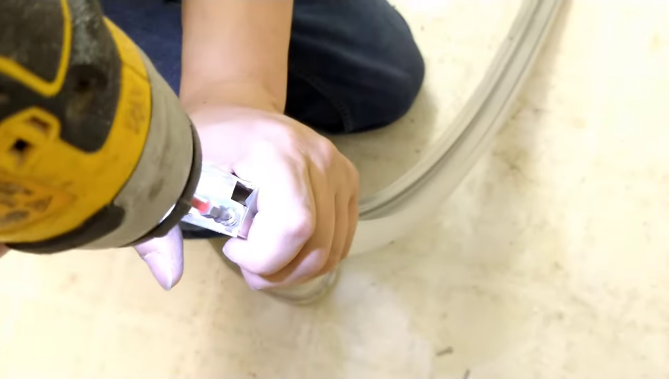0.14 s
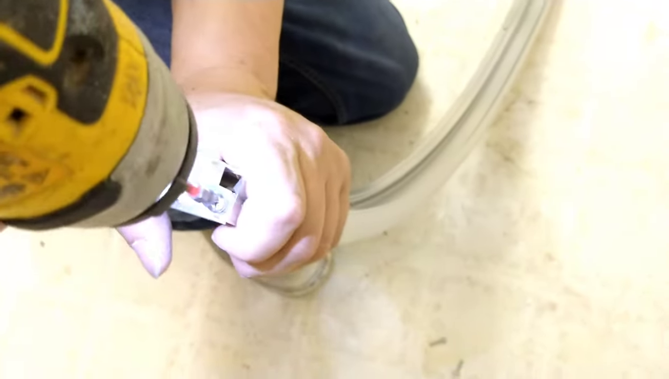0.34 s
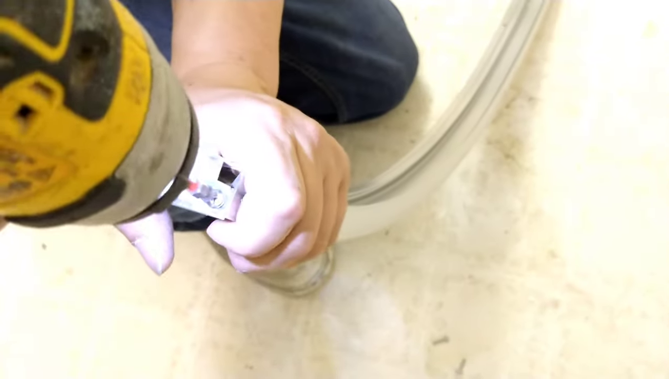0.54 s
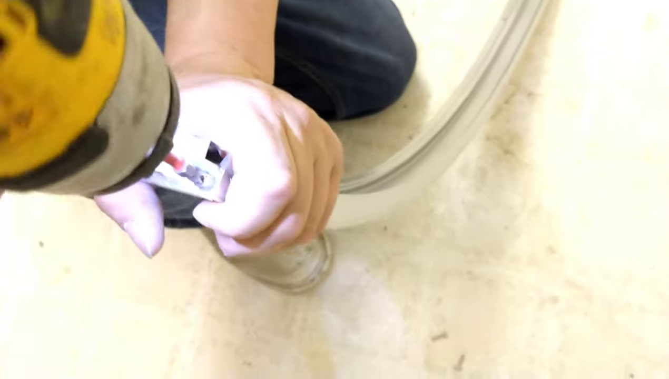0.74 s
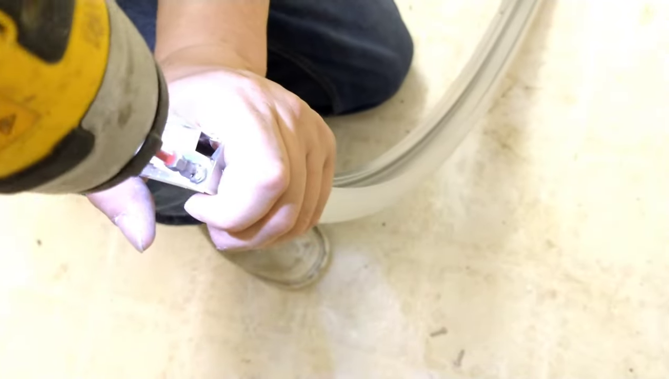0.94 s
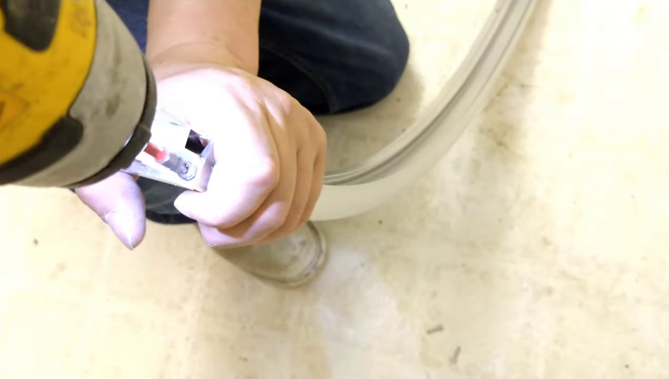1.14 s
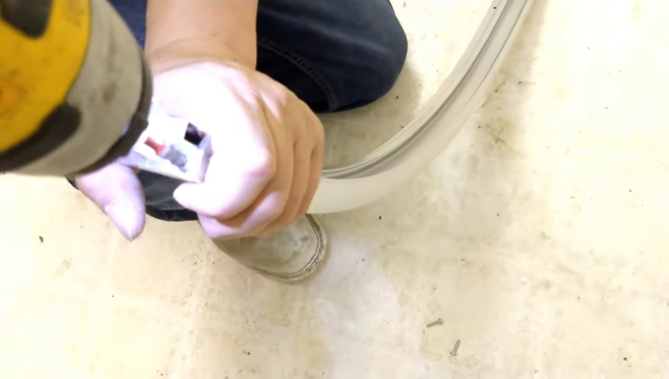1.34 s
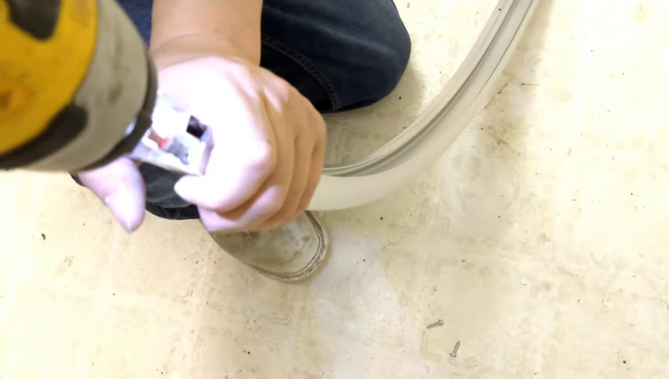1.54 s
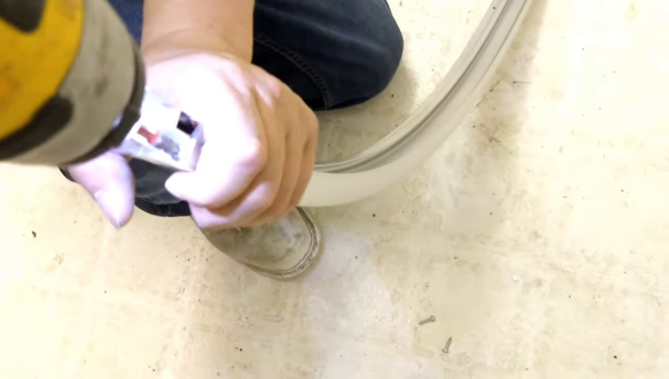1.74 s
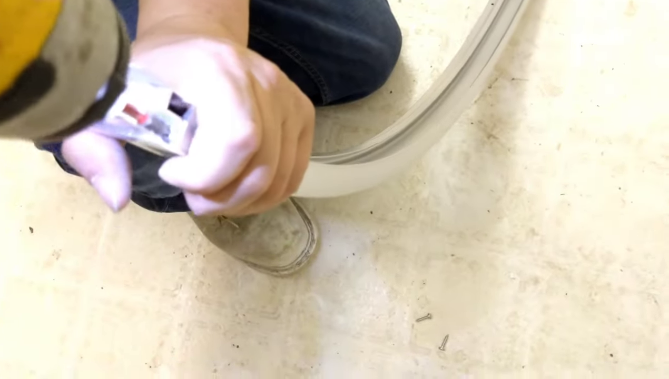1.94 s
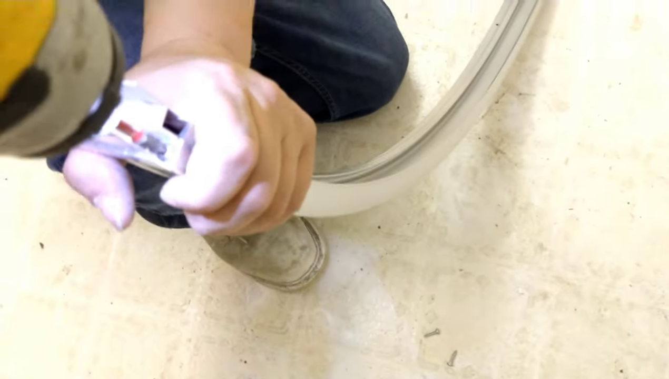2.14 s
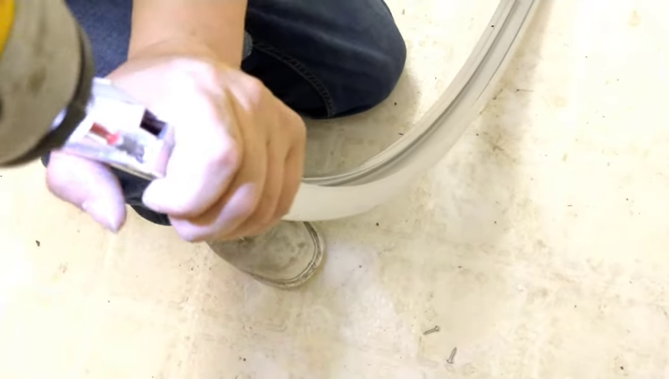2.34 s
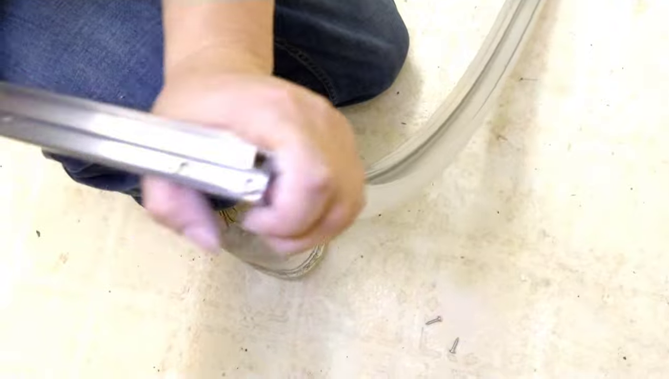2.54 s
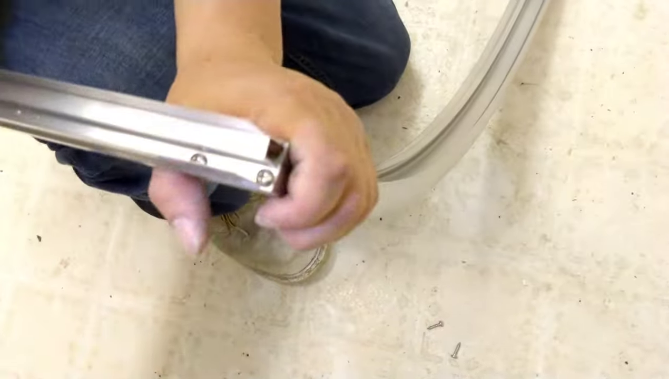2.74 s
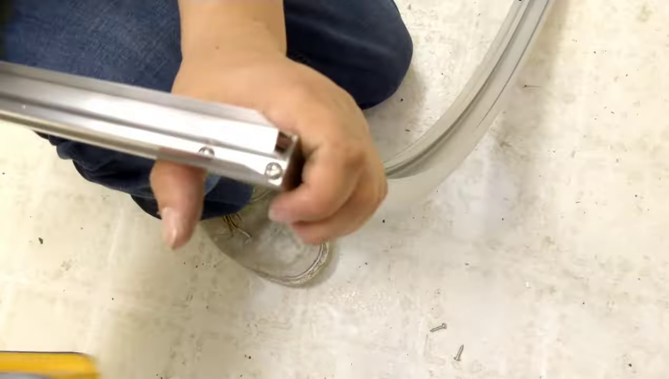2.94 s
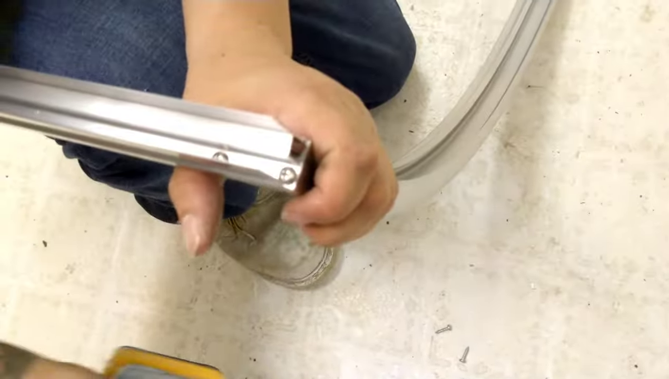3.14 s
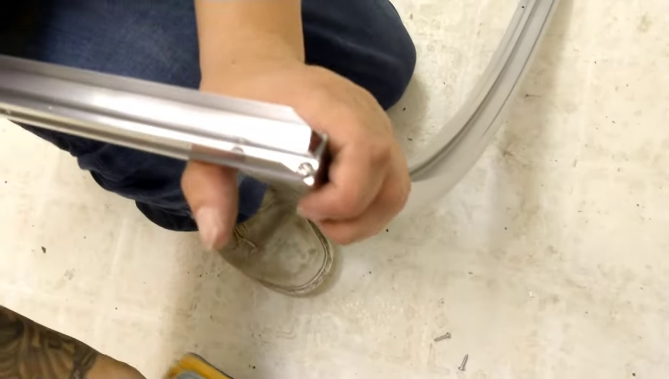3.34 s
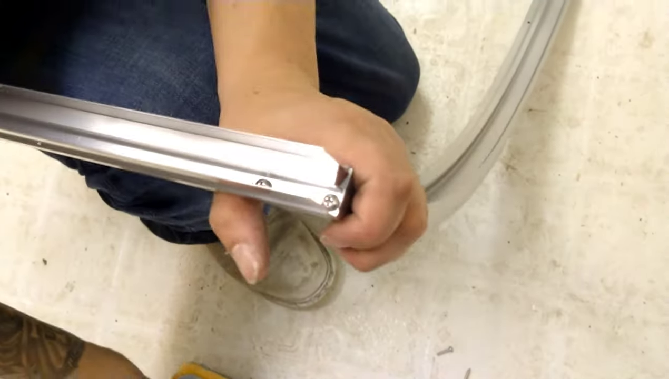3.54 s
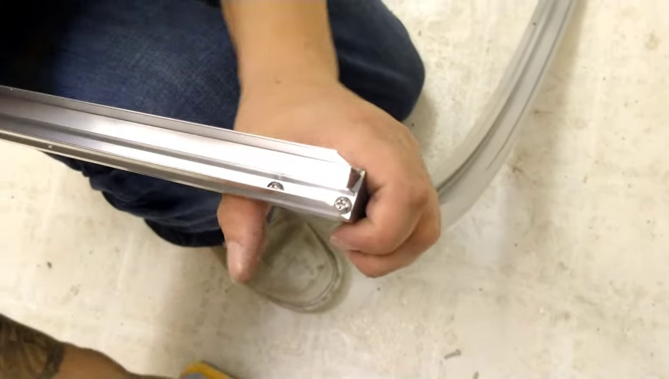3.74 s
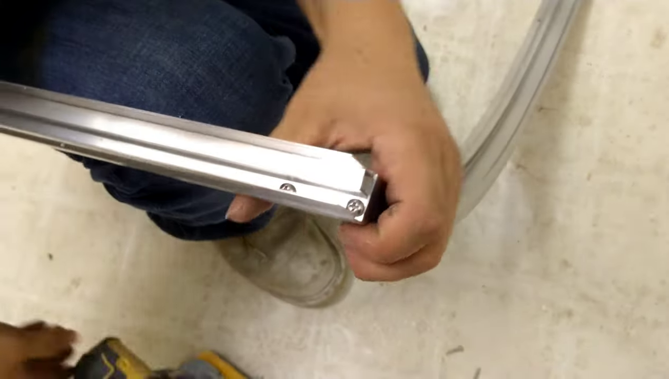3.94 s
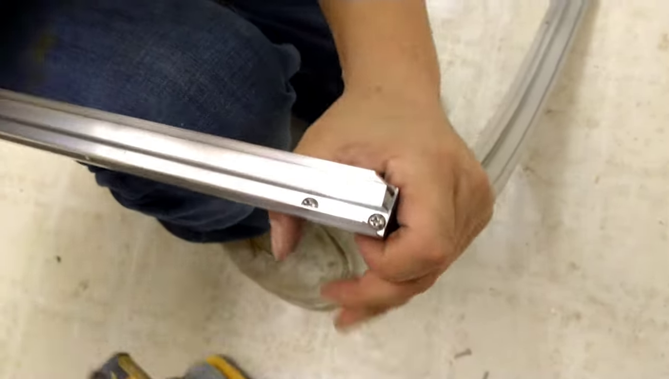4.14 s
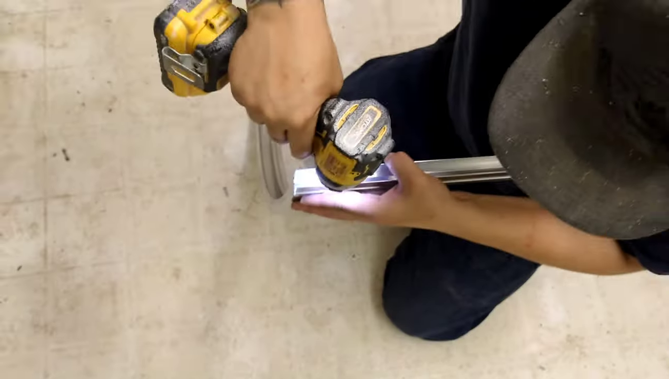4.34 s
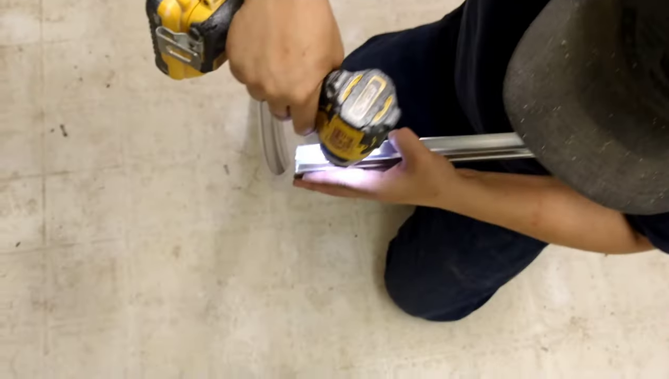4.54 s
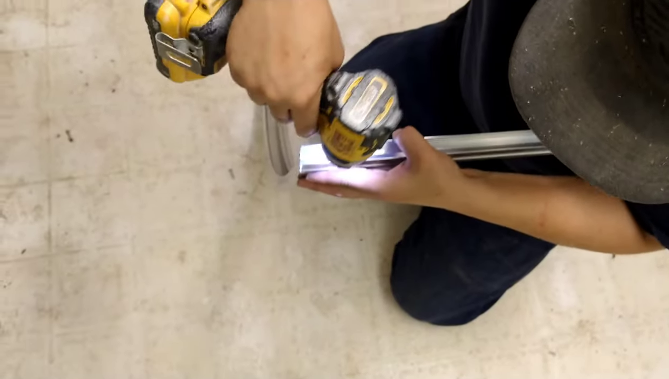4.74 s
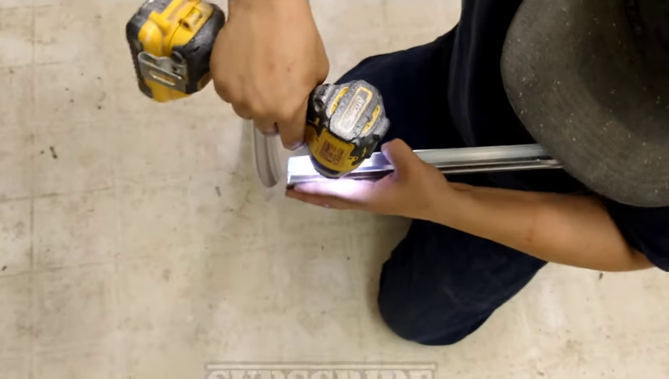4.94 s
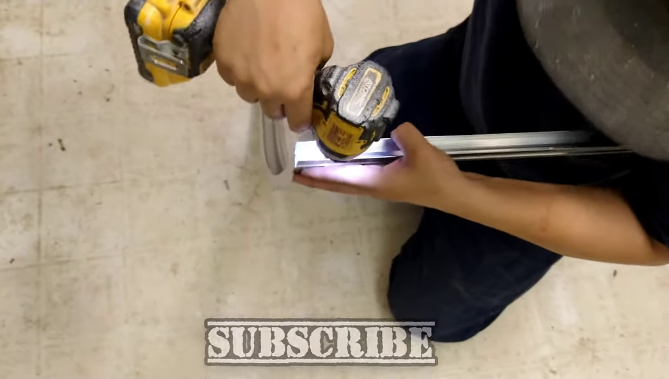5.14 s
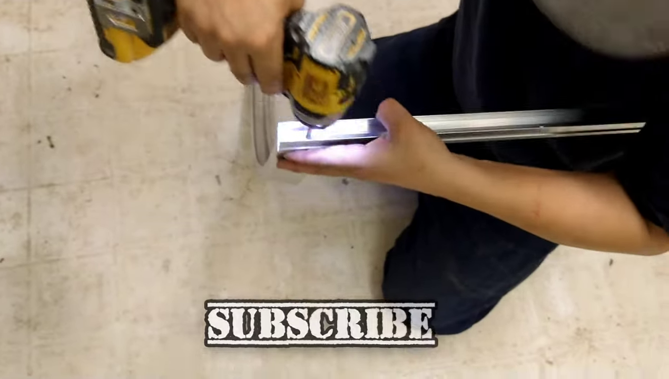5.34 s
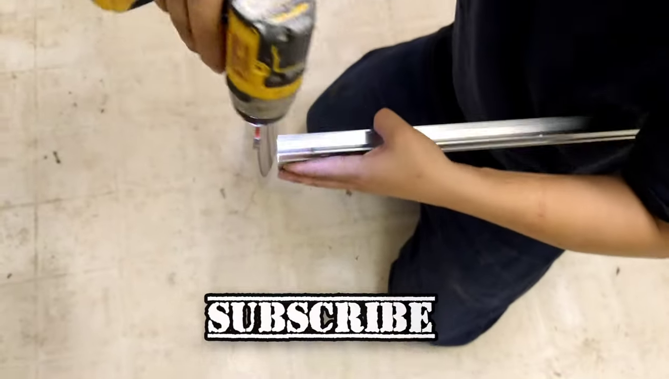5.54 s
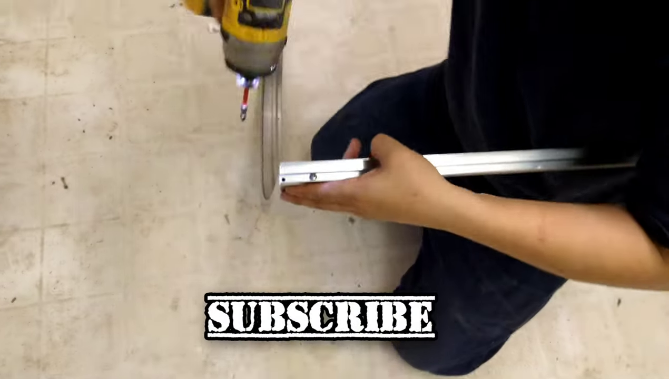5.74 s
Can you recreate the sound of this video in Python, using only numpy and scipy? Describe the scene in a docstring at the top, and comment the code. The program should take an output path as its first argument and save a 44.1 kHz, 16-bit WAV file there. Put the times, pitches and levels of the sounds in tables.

```python
"""A cordless impact driver runs two screws into an aluminium track in a bare, hard-floored room: one close, one further off.
Its gears tick faster as the trigger is squeezed; the bit chatters and slips on the screw head and the track rings.
Pulse trains and noise make the gears and contacts, resonators the ringing metal, and dying noise the room.
Between the screws the track turns in the hand with a few dull knocks; everything drops out briefly before the second.
Two microphones hear the bass alike and the fine detail partly apart, over a quiet bed of room air."""
import sys
import numpy as np
from scipy import signal
from scipy.fft import rfft, irfft, next_fast_len
from scipy.io import wavfile
from scipy.ndimage import uniform_filter1d

SR = 44100
rng = np.random.default_rng(int(sys.argv[2]) if len(sys.argv) > 2 else 0)


def to_wav(sig):
    """Store sig (one row per channel, or 1-D mono) as 16-bit WAV at the path in sys.argv[1].

    Samples outside -1..1 are clipped; the rate is SR.
    """
    pcm = np.clip(np.atleast_2d(sig), -1, 1) * 32767
    pcm = np.round(pcm).astype(np.int16)
    wavfile.write(sys.argv[1], SR, pcm.T)  # frames by channels


N = 254456
TIME = np.arange(N) / SR

# Table levels are relative; the sources and the mix set further gains.
# Quiet air of the room: (frequency [Hz], level [dB])
AIR_COLOUR = [(15, -28.5), (40, 1), (105, 6.5), (400, -8.5), (1300, -17), (2100, -13.5), (4500, -15),
              (10000, -26), (16000, -30)]
AIR_GAIN = 1.25 * 10 ** (-70.5 / 20)  # linear
# Reverberation of the bare room: (frequency [Hz], time to fall 60 dB [s])
ROOM_DECAY = [(100, 1), (400, 0.61), (1000, 0.67), (2300, 0.6), (4500, 0.42), (8000, 0.34), (15000, 0.18)]
# Total dropout before the second screw: (start [s], end [s])
DROPOUT = (4.329, 4.364)
# Soft low bumps of air and handling at the microphones: (peak time [s], level [dB], swell [s], decay [s])
MIC_BUMPS = [(2.01, -43.5, 0.042, 0.13), (4.152, -35.5, .005, .022)]
# Their low tone: (frequency [Hz], level [dB])
MIC_BUMP_COLOUR = [(20, -13.5), (70, 3), (120, -1), (200, -11.5), (500, -30.5), (2000, -81.5)]
# Dull knocks: (time [s], level [dB], contact softness as cut-off [Hz], crisp tick level [dB])
KNOCK_BLOWS = [(3.551, -5.5, 240.4, -28), (3.9383, -11, 1207, -38), (4.145, -29.5, 91, -58),
               (4.2524, -10, 800, -41.5)]
# Low modes rung by the knocks: (frequency [Hz], level [dB], time to fall 60 dB [s])
KNOCK_RINGS = [(109, -16, 0.107), (206, -11, 0.27), (262.2, -14, 0.42), (308, -31, 0.55), (337, -5.5, 0.13),
               (450, -9, 0.14), (474.5, -18.5, 0.31), (506, -9.5, 0.15), (769, -4, 0.061), (913, -4, 0.053)]
# Tone of the knocks' thump: (frequency [Hz], level [dB])
THUMP_COLOUR = [(40, -15), (110, -7.5), (300, 7.5), (550, 0), (900, -12), (1200, -16.5), (2200, -17),
                (5000, -33), (16000, -50)]
# The track slides and turns in the hand: (peak time [s], level [dB], swell [s], decay [s])
HAND_STROKES = [(0.505, -41, 0.0053, 0.011), (2.315, -42, 0.023, 0.023), (2.47, -42, 0.0015, 0.18),
                (2.605, -26.5, 0.059, 0.023), (3.245, -64, 0.011, 0.024), (3.42, -54.5, 0.027, .035),
                (3.535, -57.5, 0.039, 0.0068), (3.85, -59.5, 0.014, .02), (4.235, -54.5, .04, .02)]
# Tone of the handling and of the knocks' crisp ticks: (frequency [Hz], level [dB])
HAND_COLOUR = [(40, -34.5), (90, -8.5), (260, 6), (550, -3.5), (730, -3.5), (1250, -8), (2550, -3),
               (3200, -7.5), (8000, -14.5), (11000, -26), (16000, -28.5)]
# The driver is shifted on the screw and lifted off: (peak time [s], level [dB])
DRIVER_SHIFTS = [(0.006, -60.5), (0.085, -61.5), (4.379, -41.5), (5.571, -36), (5.715, -41)]
SHIFT_SWELL_S, SHIFT_DECAY_S = 0.021, 0.031
# Tone of those shifts: (frequency [Hz], level [dB])
DRIVER_SHIFT_COLOUR = [(40, -10.5), (90, -8.5), (290, 2), (600, -7), (1000, -5), (1600, -6.5), (2400, 1.5),
                       (3300, -9), (5500, -18), (7000, -28), (16000, -48)]
# Resonances of the track and the driver's nose: (frequency [Hz], width [Hz], level [dB])
TRACK_MODES = [(732, 38, 1.5), (885, 9.8, -3.5), (1910, 21, 2), (2104, 30, 2.5), (2194, 14, 5),
               (2490, 39, -2), (3160, 2.7, -4.5), (3340, 4.2, -1.5), (3430, 3.6, -5.5), (5260, 240, -8),
               (5445, 8.3, -6), (5730, 32, -11.5)]
# Bit and screw rattle against the track: (time [s], level [dB], decay [s])
RATTLE_FLURRIES = [(0.233, -52.5, 0.036), (0.262, -32, 0.039), (0.338, -34, 0.022), (0.438, -46, 0.015),
                   (0.644, -14.5, 0.014), (2.388, -46, 0.006), (2.466, -30, 0.054)]
# Tone of the rattles: (frequency [Hz], level [dB])
RATTLE_TONE = [(100, -18.5), (550, -22.5), (800, -13), (1200, -23.5), (2100, -2.5), (2600, 0), (3200, -9),
               (5600, -13), (7700, -9), (10500, -26), (16000, -31)]
# Single clicks of trigger and bit: (time [s], level [dB])
LONE_CLICKS = [(0.5035, -41), (0.625, 1), (2.458, -34), (2.765, -25)]
# The bit jumps out of the cross and bites again: (time [s], level [dB])
BIT_SLIPS = [(1.406, -3), (1.42, -5), (1.436, -20), (1.52, -7.5), (1.528, -10), (1.587, -6.5), (1.655, -6),
             (1.720, -3.5), (1.784, -3.5), (1.861, -3.5), (1.886, -11), (5.022, 0), (5.04, -6),
             (5.047, -8.5)]
# The hardest slips jolt the whole track: (time [s], level [dB])
TRACK_JOLTS = [(1.407, -19.5), (5.022, -22), (5.036, -22.5)]
JOLT_DECAY_S = 0.028
# Tone of the jolts: (frequency [Hz], level [dB])
JOLT_TONE = [(60, -21), (240, -1), (520, -5), (750, -5.5), (1300, -1), (2000, -6.5), (8000, -44.5)]
# The bit chatters on the screw head: (start [s], end [s], level [dB])
CHATTER_SPELLS = [(1.399, 1.92, -18), (5.021, 5.125, -20.5)]
# Tone of the chatter, slips and clicks: (frequency [Hz], level [dB])
BIT_COLOUR = [(40, -31.5), (100, -12.5), (260, -3.5), (560, -9.5), (750, -4.5), (1100, -10), (1750, -1.5),
              (2150, 3), (2800, 1), (5300, 2.5), (8300, -0.5), (11500, -10), (16000, -12)]
BITE_S, LET_GO_S = .002, .06  # attack and release of the chatter
FLARE_GAIN, FLARE_DECAY_S = 2 * 10 ** (-16 / 20), 0.022  # linear gain on the slip table's level
# The trigger is held at one setting: (start [s], end [s], gear ticks [1/s], level [dB], glide time [s])
TRIGGER_PULLS = [(0.615, 0.84, 86, -31.5, 0.0062), (0.843, 0.968, 71, -34, 0.0074),
                 (0.968, 1.278, 333, -25.5, .012), (1.279, 1.931, 283, -26.5, .012),
                 (1.934, 2.057, 322, -22.5, .015), (4.533, 4.687, 300, -20.5, .035),
                 (4.744, 4.78, 212, -29, 0.014), (4.935, 5.217, 310, -23, 0.02)]
COAST_S, UNLOAD_S = .3, 0.044  # trigger let go: the rotor slows, the gears fall quiet
SOFTEN_S, SOFT_HZ = 0.011, 4840  # without drive the teeth soon meet softly and lose their treble
CRAWL_TICKS_PER_S = 76  # at or below this setting the gears crawl and sound dull
# Gear tone, one table for the first screw and one for the second: (frequency [Hz], level [dB])
GEAR_TONES = [
    [(100, -29.5), (200, -6.5), (450, -16), (900, -7.5), (1100, -10.5), (1380, -3.5), (1650, -6), (2300, 0),
     (3200, -2), (4000, 1.5), (4800, -5), (6200, -7), (10000, -19.5), (16000, -33.5)],
    [(60, -42), (270, -9), (450, -18), (950, -18), (1350, -8), (1650, -10), (2500, 1), (3100, -3.5),
     (5400, -2.5), (8000, -13.5), (16000, -31.5)],
]
# Wavering whine: (multiple of the tick rate, level [dB])
WHINE_TONES = [(0.639, -32), (1.002, -26), (1.5, -24.5), (3, -35)]
# Rough tones of the free-running teeth: (multiple of the tick rate, level [dB])
FREE_TONES = [(7.3, -5.5), (13, -4), (17, -1.5)]
FULL_TICKS_PER_S, COAST_GROWTH = 320, 2.4  # coasting tones grow as this power of the speed
COAST_WAVERS_PER_S = 700  # how fast their strength changes


def from_db(db):
    """Level in dB to linear amplitude."""
    return 10 ** (np.asarray(db) / 20)


def rms_one(x):
    """Scale to an rms of 1."""
    return x / np.sqrt(np.mean(x ** 2) + 1e-20)


def at_hz(points, hz):
    """Read a table on a log-frequency axis."""
    known_hz, values = np.transpose(points)
    return np.interp(np.log(np.maximum(hz, 1)), np.log(known_hz), values)


def colour(x, spectrum, size=8192):
    """Causal (minimum-phase) filter with the given spectrum and unit power gain."""
    level_db = at_hz(spectrum, np.fft.rfftfreq(size, 1 / SR))
    cepstrum = irfft(np.log(from_db(level_db)))
    # folding the cepstrum forward in time makes the filter causal
    cepstrum[1:size // 2] *= 2
    cepstrum[size // 2 + 1:] = 0
    response = irfft(np.exp(rfft(cepstrum)))[:size // 2]
    response = response / np.linalg.norm(response)
    return signal.oaconvolve(np.atleast_2d(x), [response], axes=1)[:, :N]


def resonance(x, hz, width_hz):
    """Two-pole band-pass with gain 1 at its centre."""
    r = np.exp(-np.pi * width_hz / SR)
    feedback = [1, -2 * r * np.cos(2 * np.pi * hz / SR), r * r]
    return signal.lfilter(np.array([1, 0, -1]) * (1 - r * r) / 2, feedback, x + 1e-18)


def two_ways(draw, shared=0.23):
    """Each microphone receives partly the same fine detail and partly its own."""
    return np.sqrt(shared) * draw() + np.sqrt(1 - shared) * np.array([draw(), draw()])


def hiss():
    """Stereo white noise."""
    return two_ways(lambda: rng.standard_normal(N))


def drift(per_s):
    """Smooth chance with a spread of about 1."""
    knots = rng.standard_normal(8192)
    return np.interp(TIME * per_s, np.arange(len(knots)), knots)


def strokes_at(rows):
    """One impulse for each row (time [s], level [dB])."""
    out = np.zeros(N)
    for s, db in rows:
        out[int(s * SR)] += from_db(db)
    return out


def cycle_starts(per_s):
    """1 at the start of every cycle of a varying rate."""
    return np.diff(np.floor(np.cumsum(per_s) / SR), prepend=0)


def dying(strokes, seconds):
    """Each stroke jumps to its height and dies exponentially."""
    return signal.lfilter([1], [1, -np.exp(-1 / (seconds * SR))], strokes + 1e-18)


def crackle(strokes, seconds):
    """Every contact is a short crack of noise."""
    return dying(strokes, seconds) * hiss()


def grains(per_s, spread_db):
    """Random tiny contacts of uneven size; rms 1."""
    size_db = spread_db * np.clip(rng.standard_normal(N), -2, 2)
    sizes = from_db(size_db) * (rng.random(N) < per_s / SR)
    return rms_one(sizes * two_ways(lambda: rng.choice([-1, 1], N)))


def swells(rows):
    """Each stroke (peak time [s], level [dB], swell [s], decay [s]) grows to its peak and dies away."""
    out = np.zeros(N)
    for s, db, rise_s, fall_s in rows:
        near = slice(*np.searchsorted(TIME, [s - 10 * rise_s, s + 10 * fall_s]))
        away = np.maximum((s - TIME[near]) / rise_s, (TIME[near] - s) / fall_s)
        out[near] += from_db(db) * np.exp(-away)
    return out


def held(rows, release_s):
    """Ease into each setting (start [s], end [s], value, glide [s]); sink to zero when it is let go."""
    out = np.zeros(N)
    sinking = np.exp(-np.minimum(TIME / release_s, 40))
    for start, stop, value, glide_s in rows:
        on, off = int(start * SR), int(stop * SR)
        u = TIME[:off - on] / glide_s
        out[on:off] = value + (out[on] - value) * (1 + u) * np.exp(-u)
        out[off:] = out[off - 1] * sinking[:N - off]
    return np.maximum(out, 0)


def air():
    """The quiet of the room: steady coloured noise."""
    return AIR_GAIN * colour(hiss(), AIR_COLOUR)


def diffuse(t60_scale, build_s, count=10):
    """Stereo response of scattered echoes: octave-like bands die at their own rate."""
    t = TIME[:SR]
    hz = np.fft.rfftfreq(SR, 1 / SR)
    field = rfft(rng.standard_normal((2, SR)))
    centres = np.geomspace(40, 16000, count)
    out = 0
    for centre, pick in zip(centres, np.eye(count)):
        band = irfft(field * at_hz(np.c_[centres, pick], hz), SR)
        t60 = t60_scale * at_hz(ROOM_DECAY, centre)
        out = out + band * from_db(-60 * t / t60)
    out = out * (1 - np.exp(-(t / build_s) ** 2))
    return out / np.sqrt(np.sum(out ** 2) / 2)


def surroundings(t60_scale, early_db):
    """The room's tail plus quick echoes off the floor and walls."""
    out = diffuse(t60_scale, build_s=0.0021) + from_db(early_db) * diffuse(0.077, build_s=0.002)
    return out / np.sqrt(np.sum(out ** 2) / 2)


def place(x, response, wet_db, lag_s):
    """Direct sound reaches the right side later; room sound joins it and the power sum is normalized."""
    direct = np.array([x[0], np.roll(x[1], round(lag_s * SR))])
    wet = from_db(wet_db)
    echoes = signal.fftconvolve(x, response, axes=1)[:, :N]
    return (direct + wet * echoes) / np.sqrt(1 + wet ** 2)


def bumps():
    """Air and handling at the microphones: swelling low noise."""
    return swells(MIC_BUMPS) * colour(hiss(), MIC_BUMP_COLOUR)


def knocks(thump_db, ring_db):
    """A soft blow gives a thump, a faint tick and a cluster of low ringing modes."""
    push, ringing = np.zeros(N), np.zeros(N)
    for s, db, soft_hz, _ in KNOCK_BLOWS:
        # a softer contact pushes for longer
        r = np.exp(-2 * np.pi * soft_hz / SR)
        push += signal.lfilter([1 - r], [1, -r], strokes_at([(s, db)]) + 1e-18)
    for k, (hz, db, t60) in enumerate(KNOCK_RINGS):
        r = np.exp(-np.log(1000) / (t60 * SR))
        w = 2 * np.pi * hz / SR
        mode = signal.lfilter([0, np.sin(w)], [1, -2 * r * np.cos(w), r * r], push)
        ringing += (-1) ** k * from_db(db + ring_db) * mode
    thump = from_db(thump_db) * colour(crackle(push, 0.06), THUMP_COLOUR)
    ticks = crackle(strokes_at([(s, tick_db) for s, _, _, tick_db in KNOCK_BLOWS]), 0.01)
    return ringing + thump + colour(ticks, HAND_COLOUR)


def rubbing(strokes, spectrum, per_s):
    """Sliding contact: dense tiny catches under each stroke."""
    return colour(swells(strokes) * grains(per_s, spread_db=1.0), spectrum)


def handling():
    """The track slides and turns in the hand."""
    return rubbing(HAND_STROKES, HAND_COLOUR, per_s=3600)


def driver_shifts():
    """The driver's nose rubs with sparser catches as it is shifted and lifted."""
    strokes = [(s, db, SHIFT_SWELL_S, SHIFT_DECAY_S) for s, db in DRIVER_SHIFTS]
    return rubbing(strokes, DRIVER_SHIFT_COLOUR, per_s=730)


def track(x):
    """The metal adds its resonances to whatever shakes it."""
    return x + sum(from_db(db) * resonance(x, hz, width_hz) for hz, width_hz, db in TRACK_MODES)


def rattles():
    """Short dying flurries of metal contacts, and lone clicks."""
    flurries = sum(dying(strokes_at([(s, db)]), seconds) for s, db, seconds in RATTLE_FLURRIES)
    clicks = crackle(strokes_at(LONE_CLICKS), 0.0007)
    rattling = colour(flurries * grains(4000, spread_db=5.5), RATTLE_TONE)
    return rattling + from_db(-17) * colour(clicks, BIT_COLOUR)


def slips():
    """Hard cracks as the bit drops back into the cross, and the low jolt of the track."""
    jolts = colour(crackle(strokes_at(TRACK_JOLTS), JOLT_DECAY_S), JOLT_TONE)
    cracks = colour(crackle(strokes_at(BIT_SLIPS), 0.0017), BIT_COLOUR)
    return from_db(-2.5) * cracks + jolts


def chatter(spell, blows_per_s, grind_db):
    """The bit hammers unevenly on the screw head and grinds between blows, flaring after each slip."""
    start, stop, db = spell
    nearby_slips = [row for row in BIT_SLIPS if start - .5 < row[0] < stop + .5]
    flares = FLARE_GAIN * dying(strokes_at(nearby_slips), FLARE_DECAY_S)
    pressure = np.hypot(held([(start, stop, from_db(db), BITE_S)], LET_GO_S), flares)
    blows = cycle_starts(blows_per_s * (1 + .15 * drift(120))) * from_db(2.6 * drift(200))
    grinding = from_db(grind_db) * grains(9000, spread_db=-2.5)
    force = rms_one(crackle(blows, 0.0016)) + grinding
    return pressure * colour(rms_one(force), BIT_COLOUR)


def disperse(x, delay_s, at_pitch_hz):
    """Bending waves travel faster at high pitch, so each tick arrives as a tiny falling chirp."""
    size = next_fast_len(N + SR)
    hz = np.fft.rfftfreq(size, 1 / SR)
    phase = -4j * np.pi * delay_s * np.sqrt(hz * at_pitch_hz)
    return irfft(rfft(x, size) * np.exp(phase), size)[:N]


def gears(pulls, spectrum, dispersion_s, mesh_db, whirr_db, whine_db, coast_db):
    """Alternating ticks, gritty teeth, bearing whirr and whine; rough tones fall as the rotor coasts."""
    rotor = held([(on, off, per_s, glide) for on, off, per_s, _, glide in pulls], COAST_S)
    load = held([(on, off, from_db(db), glide) for on, off, _, db, glide in pulls], UNLOAD_S)
    # 1 under drive, 0 at a crawl or with the trigger let go
    driven = held([(on, off, per_s > CRAWL_TICKS_PER_S, glide) for on, off, per_s, _, glide in pulls], SOFTEN_S)
    speed = np.maximum(rotor, 20) * (1 + .012 * drift(120) + .03 * drift(18))
    turn = 2 * np.pi * np.cumsum(speed) / SR

    strong_weak = 1 + .15 * np.cos(turn / 2)
    ticks = cycle_starts(speed) * strong_weak * from_db(1.2 * drift(300)) / np.sqrt(speed)
    teeth = crackle(cycle_starts(speed * 2) / np.sqrt(speed), 0.00051)
    force = rms_one(disperse(ticks, dispersion_s, at_pitch_hz=4021))
    force = force + from_db(mesh_db) * rms_one(teeth)
    whirr = from_db(whirr_db) * hiss()
    bright = colour(rms_one(force + whirr), spectrum)
    dull = signal.sosfilt(signal.butter(4, SOFT_HZ, fs=SR, output="sos"), bright)
    body = np.sqrt(driven) * bright + np.sqrt(np.maximum(1 - driven, 0)) * dull

    whine = sum(from_db(db + whine_db + 3 * drift(20)) * np.sin(multiple * turn)
                for multiple, db in WHINE_TONES)
    tones = sum(from_db(db + coast_db) * drift(COAST_WAVERS_PER_S) * np.sin(multiple * turn)
                for multiple, db in FREE_TONES)
    coasting = (rotor / FULL_TICKS_PER_S) ** COAST_GROWTH * tones
    return load * (body + whine) + (1 - driven) * coasting


def scene():
    """The first screw is close by, the second further off; nothing close rings on across the dropout."""
    room = surroundings(0.89, early_db=-3.5)
    early = TIME < DROPOUT[0]
    first_pulls = [p for p in TRIGGER_PULLS if p[0] < DROPOUT[0]]
    second_pulls = [p for p in TRIGGER_PULLS if p[0] > DROPOUT[1]]

    first = gears(first_pulls, GEAR_TONES[0], dispersion_s=.004,
                  mesh_db=0, whirr_db=-5, whine_db=-3.5, coast_db=-30.5)
    first += chatter(CHATTER_SPELLS[0], blows_per_s=155, grind_db=1.5)
    second = gears(second_pulls, GEAR_TONES[1], dispersion_s=.005,
                   mesh_db=-0.5, whirr_db=0.5, whine_db=-6.5, coast_db=-32)
    second += chatter(CHATTER_SPELLS[1], blows_per_s=165, grind_db=0.5)
    cracks = slips()

    close = track(first + cracks * early + rattles() + handling())
    far = track(second + cracks * ~early + driver_shifts())
    close_in_room = place(close, room, wet_db=-2.5, lag_s=.0003)
    knock_room = surroundings(0.8, early_db=-9.5)
    close_in_room += place(knocks(thump_db=-17, ring_db=-8.5), knock_room, wet_db=-4.5, lag_s=.00007)
    far_in_room = place(far, room, wet_db=0.0, lag_s=.00004)
    return close_in_room * early + far_in_room + bumps() + air()


def record(dry):
    """Both microphones hear long waves alike, the right brighter; a brief dropout, rounded peaks, top cut."""
    side = signal.sosfilt(signal.butter(1, 420, "high", fs=SR, output="sos"), (dry[0] - dry[1]) / 2)
    ports = dry.mean(axis=0) + side * [[1], [-1]]
    ports = signal.sosfilt(signal.butter(1, 40, "high", fs=SR, output="sos"), ports)
    # treble is taken from the left and added to the right
    ports = ports + from_db(-20) * resonance(ports, hz=10370, width_hz=14000) * [[-1], [1]]
    audible = (TIME < DROPOUT[0]) | (TIME > DROPOUT[1])
    heard = uniform_filter1d(1. * audible, size=64)  # softened edges
    rounded = 1.1 * np.tanh(ports * heard / 1.1)
    return signal.sosfilt(signal.ellip(12, .1, 90, 16200, fs=SR, output="sos"), rounded)


dry = scene()
out = record(dry)
to_wav(out)
```